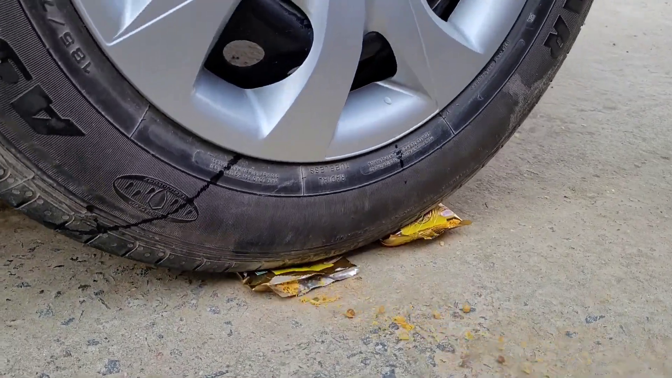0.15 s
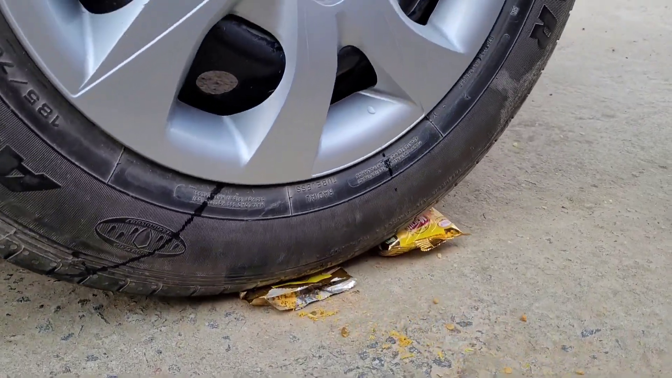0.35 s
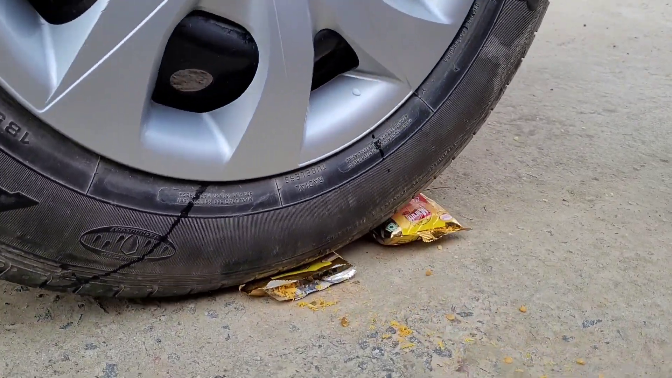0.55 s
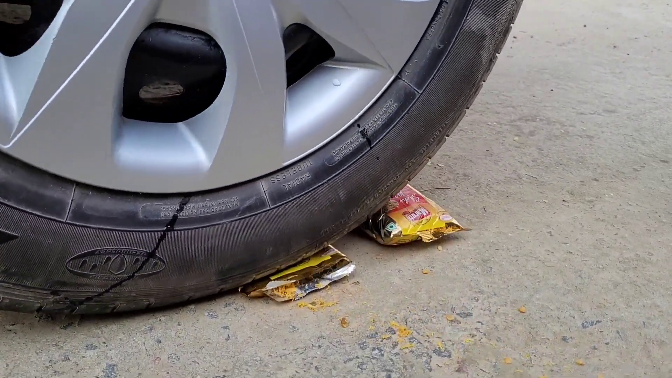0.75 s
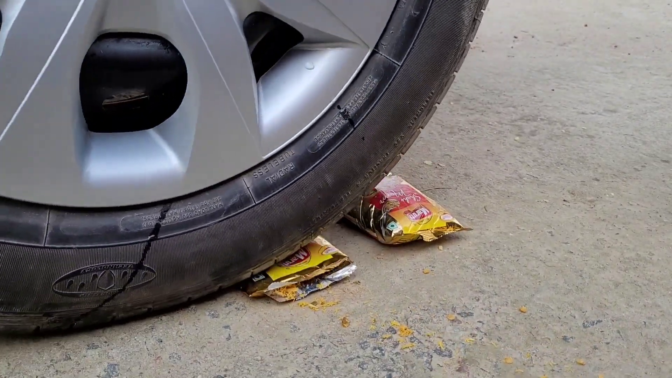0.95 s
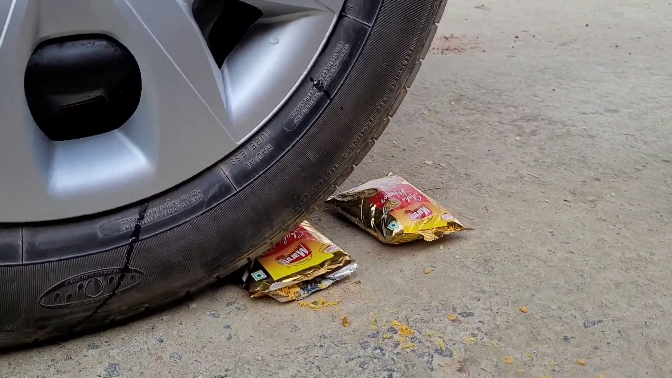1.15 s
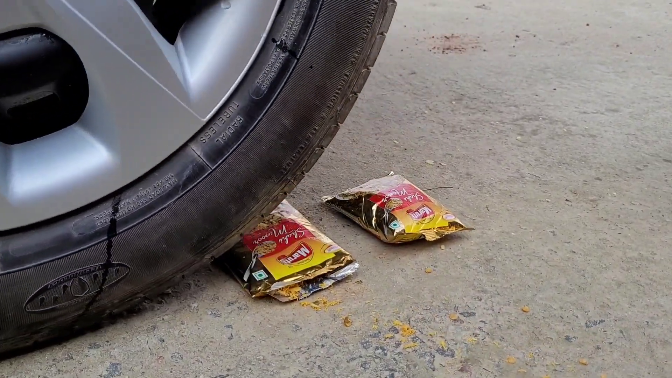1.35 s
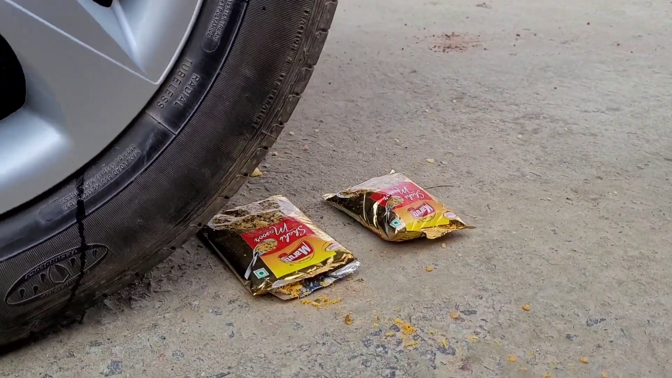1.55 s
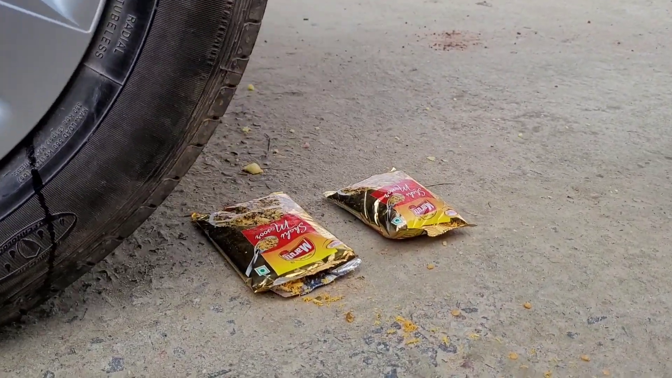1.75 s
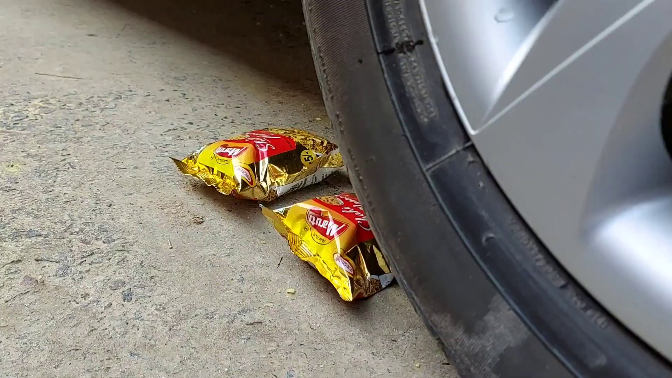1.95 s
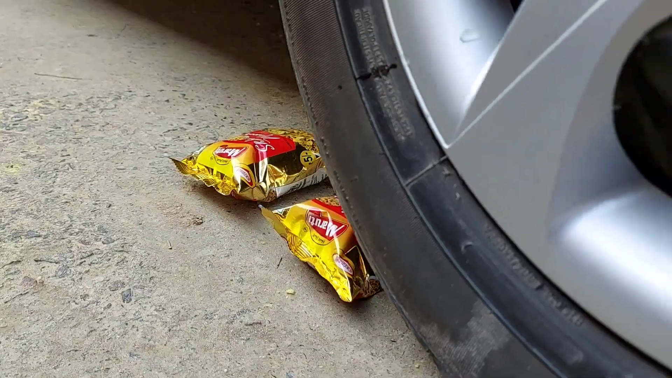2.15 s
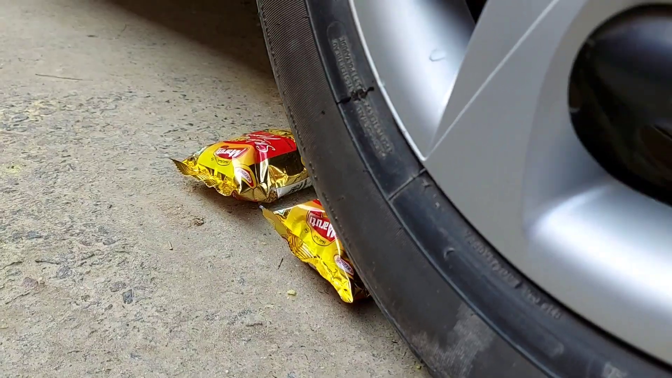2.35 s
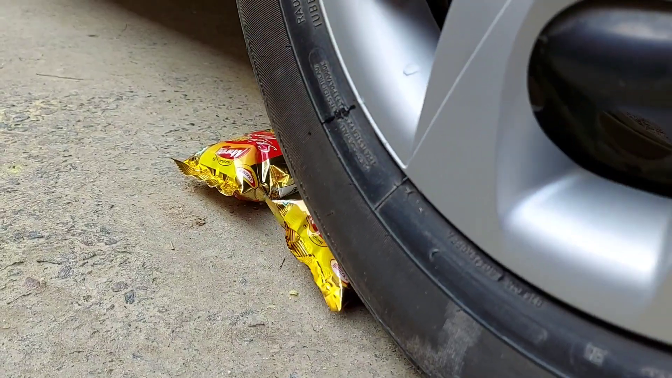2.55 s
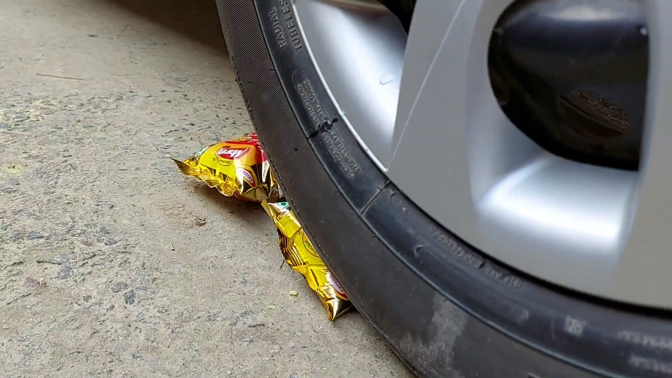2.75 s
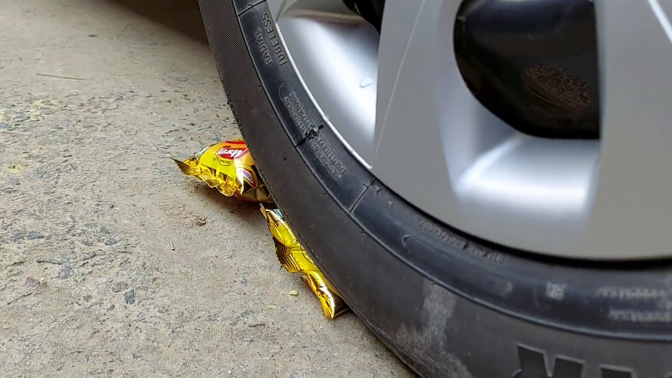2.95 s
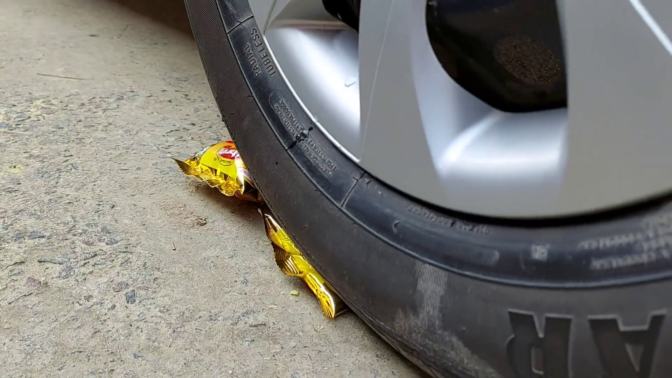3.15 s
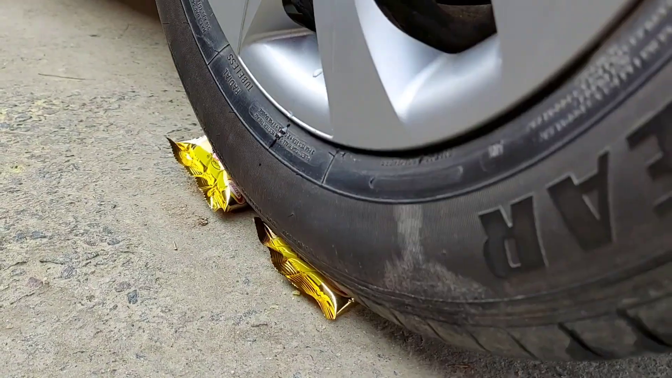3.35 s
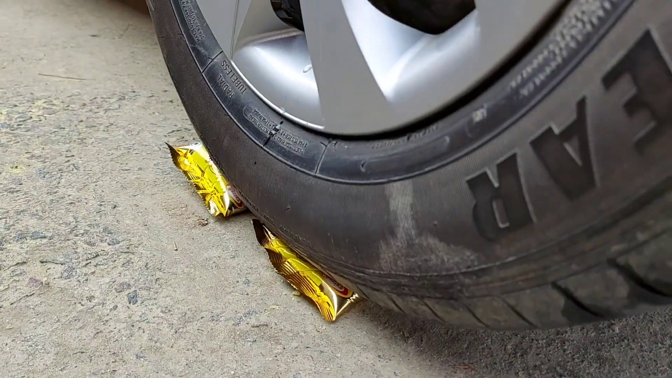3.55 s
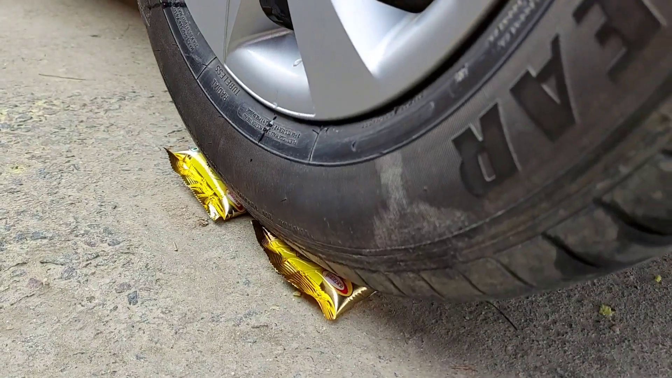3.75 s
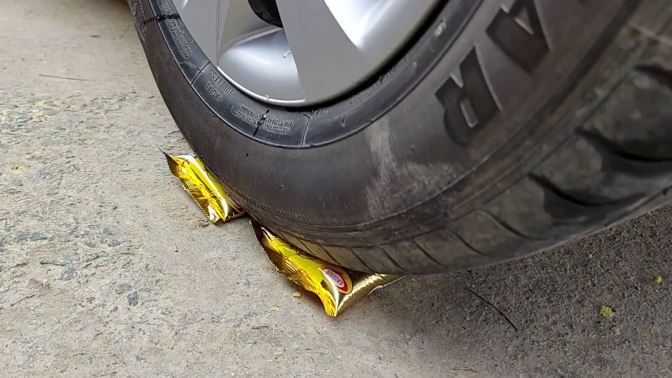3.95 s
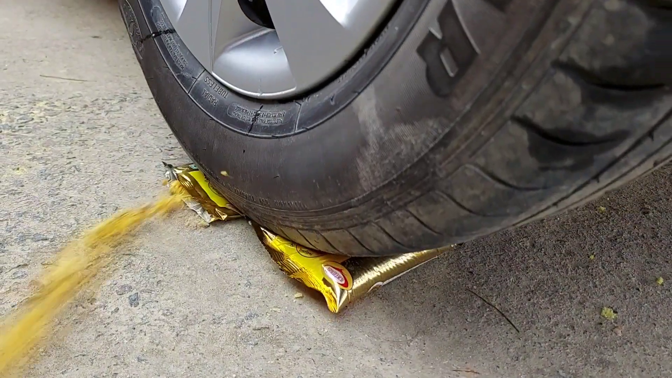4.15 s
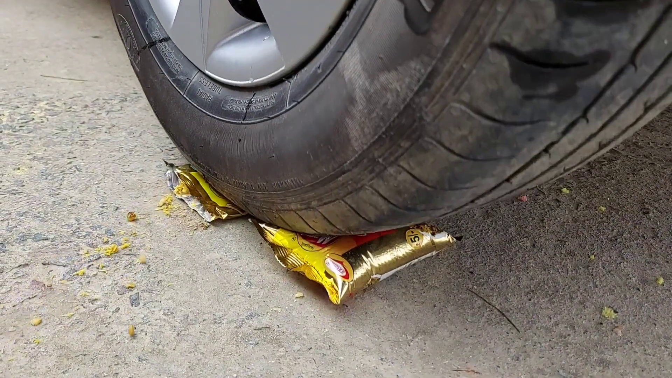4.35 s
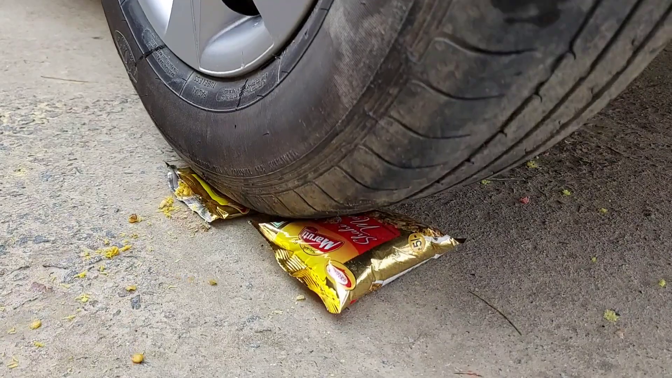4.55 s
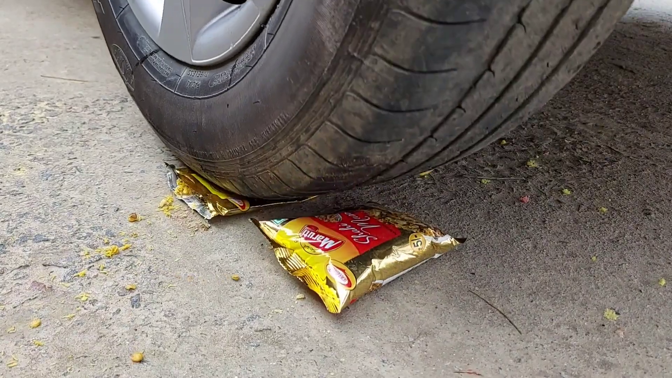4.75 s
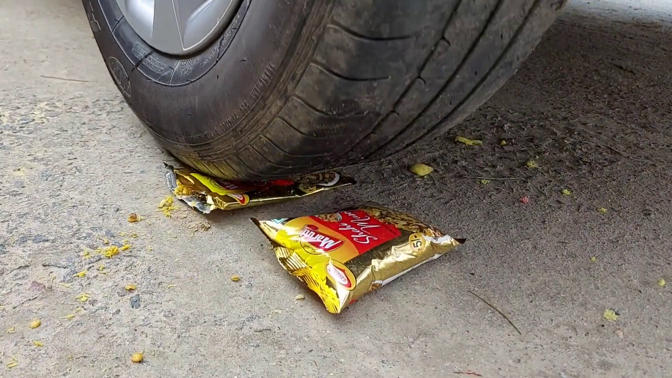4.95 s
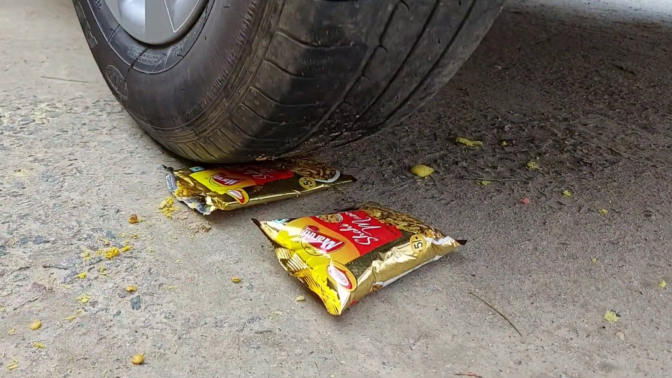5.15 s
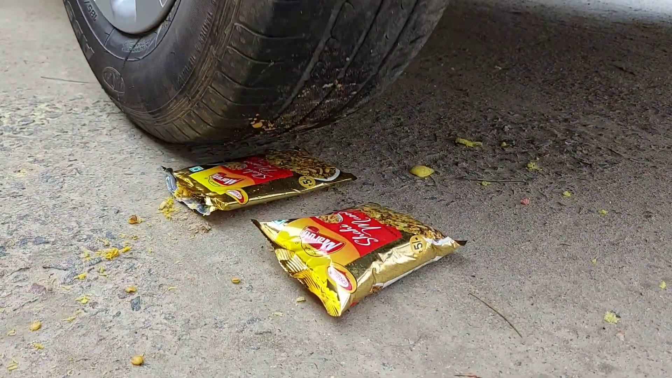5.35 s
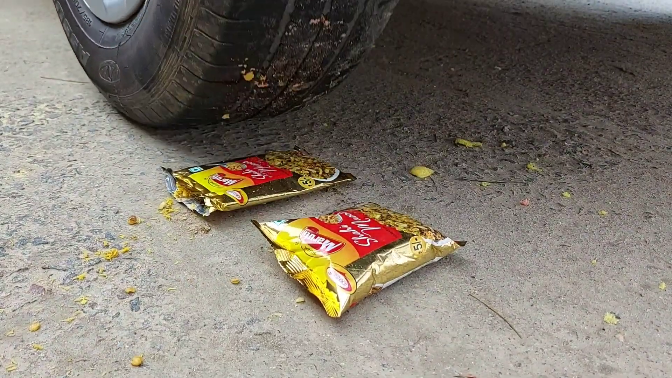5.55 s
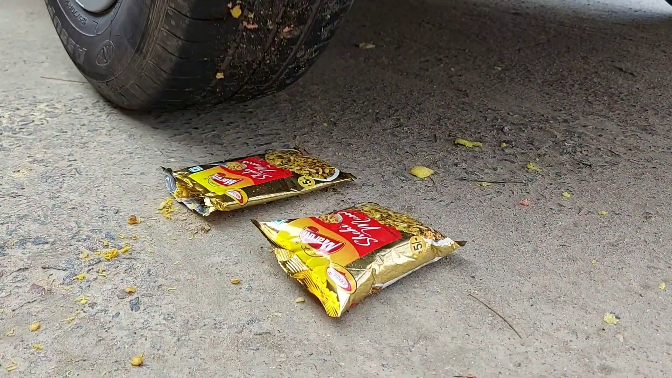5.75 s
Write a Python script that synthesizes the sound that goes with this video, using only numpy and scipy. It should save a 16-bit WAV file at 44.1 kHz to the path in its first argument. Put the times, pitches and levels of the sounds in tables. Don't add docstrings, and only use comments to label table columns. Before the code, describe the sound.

Close outdoor crunching: one airy bang, faint foil ticks over low engine idle, a brief fade, crackling snaps, then a sharper ringing burst.

```python
import sys
import numpy as np
from scipy import signal
from scipy.fft import rfft, irfft
from scipy.io import wavfile
from scipy.ndimage import uniform_filter1d

SR = 44100
rng = np.random.default_rng(int(sys.argv[2]) if len(sys.argv) > 2 else 0)


def voltage_ratio(decibels):
    exponent = np.asarray(decibels, float) / 20
    return 10 ** exponent


def generate_wav(sig):
    pcm = np.round(np.clip(np.atleast_2d(sig).T, -1, 1) * 32767).astype(np.int16)
    wavfile.write(sys.argv[1], SR, pcm)


N = 255471

BURST_TIMES = [
    .0918,
    4.2153,
]
# (level [dB rms], hold [s], t60 [s], first crack [dB], wall echo [dB])
BURST_JETS = [
    (-14.5, 0.026, 0.084, -23.5, -13.5),
    (-12.5, 0.0011, 0.16, -10.5, -10),
]
# (frequency [Hz], left [dB], right [dB])
PORT_BLASTS = [
    (59.4, -11, -43.5),
    (75.7, -39, -21.5),
]
# (frequency [Hz], density [dB per Hz])
BURST_SPECTRA = [
    [(71, -35), (120, -3.5), (177, -19.5), (334, -5.5), (473, -12), (892, -8), (1830, -13.5), (1980, -11),
     (2530, -16), (3520, -16), (5410, -25), (7050, -20), (8660, -36), (15000, -30), (16000, -48)],
    [(71, -47), (120, -6), (200, -12.5), (348, -8.5), (569, -15), (684, -6.5), (1050, -4), (1160, -8),
     (1370, -1), (1520, -8.5), (2700, -9), (4780, -14.5), (5800, -19), (6500, -32), (11300, -32.5),
     (15000, -62.5), (16000, -70.5)],
]
# (frequency [Hz], left-right [dB])
BURST_SIDES = [
    [(60, 4), (150, 0), (380, -6.5), (950, -0.5), (2380, -4.5), (5980, -6), (15000, -2.5)],
    [(60, 0), (150, 1.5), (380, 14.5), (950, 7), (2380, 11), (5980, -1.5), (15000, 1.5)],
]
# (time [s], peak [dB],
# ring [Hz], treble [dB], tail [dB])
PACKET_SNAPS = [(2.5247, -16.5, 1060, -26, -26), (2.5356, -19, 1100, -18, -18),
                (2.5544, -28.5, 2110, -10.5, -11.5), (2.5704, -27, 2310, -29, 0),
                (2.5805, -20, 1250, -31, -16), (2.5965, -9, 1420, -20.5, -14),
                (2.6054, -10.5, 2360, -21.5, -19.5), (2.6179, -12, 1210, -30.5, -17),
                (2.6254, -20.5, 1000, -48, -24), (2.6384, -14.5, 1250, -33, -11),
                (2.6469, 1.5, 2370, -24, -25), (2.6545, -13, 695, -22, -26),
                (2.6589, -5.5, 2250, -21, -11), (2.6724, -17.5, 1070, -36, -12),
                (2.6903, -7.5, 2360, -36.5, -19), (2.7048, -8, 2140, -35, -16),
                (2.7164, -14, 2670, -19.5, -2), (2.7232, -7, 2560, -24, -12),
                (2.7374, -10.5, 1580, -19.5, -12), (2.7455, -20, 3220, -18, -3),
                (2.7528, -18.5, 2200, -28.5, -16), (2.7665, -16.5, 1900, -21.5, 10),
                (2.7784, -22.5, 5000, -10.5, -18.5), (2.793, -26.5, 5000, -8.5, -10),
                (2.7965, -9, 2870, -17.5, -12), (2.817, -11.5, 2470, -7.5, -11.5),
                (2.8324, -13.5, 5130, -11.5, -9), (2.8494, -24, 2750, -20.5, 8),
                (2.8852, -30, 2200, -11, -12.5), (2.8953, -10, 5360, -22.5, -17),
                (2.897, -12, 1310, -4, -21), (2.9005, -15, 2930, -20, -9),
                (2.9125, -32.5, 4500, -2, -19), (2.9253, -34.5, 4500, -1, -22),
                (2.935, -30, 2380, -15, -9), (2.9387, -25, 4700, -5, -4),
                (2.9547, 1, 1920, -29.5, -26.5), (2.9675, -13.5, 2520, -24, -11),
                (2.9891, -17, 2030, -34, -14),
                (3.044, -17.5, 5160, -19, -10.5), (3.244, -29.5, 4470, -15, -11.5),
                    (3.4104, -23.5, 1370, -33, -15), (3.424, -27, 1280, -43, -16),
                    (3.4432, -17, 1900, -29, -29), (3.4628, -28, 1070, -15.5, -1),
                    (3.4955, -16, 2130, -16, -8), (3.5038, -23.5, 2870, -15.5, -2),
                    (3.5283, -28.5, 2800, -13, 3), (3.551, -25.5, 1900, -14.5, -10),
                    (3.602, -28, 2520, -14.5, -8), (3.6474, -31, 5000, -11, -4),
                    (3.653, -26.5, 3400, -15.5, -6.5), (3.6692, -24.5, 3420, -23, -7),
                    (3.6784, -28, 4610, -8, -8), (3.7069, -10.5, 4970, -6, -20),
                    (3.7004, -23, 4960, -18.5, -5), (3.736, -26, 4800, -14.5, -1),
                    (3.7701, -17.5, 5670, -9.5, -2.5), (3.799, -36, 4000, -6.5, -18),
                    (3.8042, -26.5, 4460, -15.5, -5), (3.8352, -22, 4200, -5.5, -14),
                    (3.871, -35, 1220, -9, -16), (3.9478, -20.5, 3400, -5.5, -16),
                    (3.979, -28, 2740, -7, 4), (4.026, -17, 5030, -18.5, -11),
                    (4.0574, -28.5, 1050, -20.5, -16), (3.4918, -22.5, 2600, -13.5, -5),
                    (4.0997, -28.5, 2190, -2, -7), (4.1057, -31.5, 1200, -17.5, -13.5),
                    (4.141, -33.5, 1330, -21, -14), (4.1697, -26.5, 1130, -21, -13),
                    (4.07, -37, 3000, 0, -18), (4.196, -36.5, 1100, -20, -18)]
# (time [s], peak [dB], ring
# [Hz], treble [dB])
FOIL_TICKS = [(0.0154, -30.5, 1350, -29), (.0468, -27, 1270, -18), (0.072, -38, 1250, -28),
              (0.3521, -44, 2680, -16), (0.521, -50, 4430, 6), (0.594, -52, 1560, -24.5),
              (0.6565, -41.5, 3420, -19), (0.812, -55.5, 1187, -14), (0.9878, -41.5, 3800, -27),
              (1.0742, -44.5, 3480, -24), (1.102, -52, 2260, -11), (1.245, -50, 5480, -9),
              (1.276, -46, 3800, -31.5), (1.5592, -39, 4520, -36), (1.7971, -23.5, 4200, -30),
              (2.214, -30, 2600, -28), (4.4767, -36, 1950, -13.5), (4.605, -43, 790, -35),
              (4.648, -53, 5500, -32), (4.5754, -38, 1940, -26), (4.7097, -44, 1370, -19),
              (4.7793, -43, 1980, -26), (5.0967, -49, 1670, -24), (5.112, -42, 1447, -13),
              (5.198, -42, 1580, -16), (5.2376, -38.5, 2020, -26), (5.35, -47, 5350, -25),
              (4.95, -47, 5200, -20), (5.2763, -44, 1990, -17), (5.3378, -48.5, 1370, -25),
              (5.3688, -45, 5240, -15), (5.4003, -48, 1430, -27.5), (5.4724, -53.5, 4900, -26),
              (3.022, -34.5, 1210, -21), (3.102, -35, 1320, -22), (3.108, -29, 2600, -9),
              (3.136, -32.5, 1400, -19), (3.147, -32.5, 1360, -16), (3.168, -24, 3420, -16),
              (3.182, -26, 3600, -11), (3.211, -34, 2300, -16), (3.251, -35, 1340, -31),
              (3.263, -31, 1350, -33), (3.304, -41, 1460, -31), (3.325, -32.5, 1400, -39),
              (3.343, -41, 1700, -33), (3.358, -35, 1400, -36), (3.381, -33, 1300, -28),
              (3.391, -34, 1340, -49), (3.515, -22, 3260, -18), (3.543, -37, 1090, -20),
              (3.557, -34, 1300, -16.5), (3.566, -35, 1000, -4), (3.612, -42.5, 1620, -12),
              (3.915, -34, 1080, -15), (4.089, -37, 1090, -14), (4.123, -37.5, 1090, -20.5),
              (4.312, -26, 1040, -22), (0.367, -40, 6500, -25), (0.482, -44, 3500, -19),
              (0.579, -50, 6100, -24), (0.611, -47, 5800, -25)]
# (from [s], to [s], peak [dB], ring [Hz], treble [dB])
CRACK_RUNS = [
    (2, 2.9, -42, 2200, -17),
    (2.4, 5.8, -45, 2500, -14),
    (0.299, 1.2, -56.5, 2480, -16.5),
    (7.7, 5.6, -56, 2900, -33.5),
]
# (time [s], level [dB], ring [Hz])
PACKET_CREAK = [(2.971, -62, 1200), (3.03, -53.5, 1220), (3.14, -47, 1180), (3.19, -53.5, 1350),
                (3.268, -49, 1380), (3.341, -52.5, 1540), (3.42, -46, 1280), (3.5, -55, 1040),
                (3.578, -51, 1070)]
# (time [s], level [dB], ring [Hz])
FOIL_RUSTLE = [(2.418, -65, 2400), (2.426, -52, 2380), (2.45, -51, 2330), (2.464, -37.5, 2570),
               (2.5, -47.5, 2650), (2.53, -45, 2520)]
# (time [s], level [dB], ring [Hz])
CRISP_GROAN = [(2.55, -41, 303), (2.604, -30, 350), (2.63, -33, 340), (2.655, -32, 490),
               (2.701, -40.5, 455)]
# (frequency [Hz], density [dB per Hz])
SNAP_SPECTRA = [
    [(150, -22.5), (250, -4), (393, -17.5), (460, -11.5), (698, -12.5), (906, -15), (1330, -17.5),
     (2020, -13.5), (3060, -19), (4490, -14.5), (5070, -15.5), (7190, -7), (9010, -24.5), (14900, -22),
     (16000, -43)],
    [(150, -13), (250, -21.5), (308, -24), (444, 1.5), (629, -14), (1350, -9.5), (1790, -18.5), (2020, -9),
     (2960, -8.5), (4260, -7.5), (4990, 2.5), (7060, -7.5), (10400, -5.5), (14900, -32), (16000, -25.5)],
]
# (frequency [Hz], left-right [dB])
FOIL_SIDES = [
    [(60, 4), (120, 2), (240, 1), (480, -1), (950, -5), (1890, 0), (3770, -3), (7520, -8.5), (15000, 4)],
    [(60, -3.5), (120, 4), (240, 10.5), (480, 7.5), (950, 16.5), (1890, 14), (3770, 0.5), (7520, 0),
     (15000, 21.5)],
]
# (frequency [Hz], density [dB per Hz])
BED_SPECTRA = [
    [(150, -15.5), (280, -8), (800, -13.5), (1350, -20), (2100, -14), (3000, -16), (4100, -12.5),
     (5600, -17.5), (7000, -12.5), (9000, -28.5), (14900, -24), (16000, -43.5)],
    [(150, -34), (260, -5.5), (452, -4), (800, -9.5), (1500, -11), (2300, -6), (3600, -10.5), (5000, -11.5),
     (6500, -27.5), (10500, -25.5), (14000, -36), (16000, -45.5)],
]
# (time [s], half length [s], lift [dB])
FOIL_FOLDS = [
    (2.76, 0.22, 18.5),
    (3.705, 0.22, 9.5),
]
# (time [s], peak [dB], swing [Hz])
DULL_THUDS = [(0.1, -12.5, 350), (0.112, -15.5, 280), (0.808, -53, 200), (1.094, -52.5, 112),
              (2.169, -28, 180), (5.219, -44.5, 190), (4.293, -27.5, 87), (4.5, -32, 107),
              (3.6, -34.5, 150), (3.6, -30, 130), (2.578, -24, 370), (4.3, -36, 420), (1.6, -48, 290),
              (4.232, -22.5, 260)]
# (frequency [Hz], width [Hz], level [dB])
ENGINE_RESONANCES = [(30, 61, -10.5), (61.76, 6.8, 0), (95, 42, -3), (142.3, 22, -6.5), (161.7, 34, -7),
                     (205, 31, -14.5), (406, 150, -14)]
# (time [s], gain [dB], grind [dB])
GAIN_AND_GRIND = [(0.0, -36, -9.5), (0.418, -64, 1), (0.91, -67.5, -7), (1.411, -58, -10.5),
                  (1.734, -45.5, -10), (1.901, -47.5, -7), (2.12, -32.5, -16.5), (2.28, -36.5, -14),
                  (2.55, -34.5, -16), (2.75, -36, -13), (3.09, -41, -9.5), (3.46, -41.5, -7),
                  (3.71, -42.5, -7.5), (4.18, -37, -14.5), (4.32, -46.5, -1.7), (4.73, -58, -7),
                  (5.33, -57, -12), (5.79, -47.5, -16.5)]

CUT_S = 2.0
FADE_S, FADE_DB = (0.16, 0.2), -35.5
TYRE_HZ, TYRE_T60, TYRE_DB = 242, 1.13, (-36, -35)
TYRE_BEAT_HZ, TYRE_BEAT_DB = 4.3, -11
SNAP_T60, TICK_T60, T60_SPREAD_DB, TICK_TAIL_DB = 0.076, 0.04, 2, -9
PAN_DB, PAN_DB_PER_OCT, PAN_SPREAD_DB = (-2.5, 8.5), (-2.3, -4), 1
RUN_SPREAD_DB, RUN_SPREAD_OCT = 8, 0.26
GRIT_HZ, SPLIT_HZ = 3850, 7800
GRIT_DB, FIZZ_DB = (2, 2), (-10, -16)
PORT_LAG = 4
HALVES = np.array([[0.5], [-0.5]])


def evened(x):
    return x / np.sqrt(np.mean(x ** 2) + 1e-20)


def read(points, hz):
    f, value = np.transpose(points)
    return np.interp(np.log(hz + 1), np.log(f + 1), value)


def add(mix, s, sound):
    part = mix[:, round(s * SR):][:, :sound.shape[1]]
    part += sound[:, :part.shape[1]]


def coloured(x, shape_db):
    log = np.log(voltage_ratio(np.maximum(shape_db, -100)))
    mirrored = np.concatenate([log, log[..., -2:0:-1]], -1)
    phase = -signal.hilbert(mirrored).imag[..., :log.shape[-1]]
    return irfft(rfft(x) * np.exp(log + 1j * phase), x.shape[-1])


def ports(colour, side, hz):
    return read(colour, hz) + HALVES * read(side, hz)


def resonate(x, hz, width):
    return signal.lfilter(*signal.iirpeak(hz, hz / width, SR), x)


def tyre_ring(t, tyre_db):
    ring = np.sin(2 * np.pi * TYRE_HZ * t)
    ring += voltage_ratio(TYRE_BEAT_DB) * np.sin(2 * np.pi * (TYRE_HZ - TYRE_BEAT_HZ) * t)
    return voltage_ratio(tyre_db - 60 * t / TYRE_T60) * ring


def port_blast(t, blast):
    hz, *side_db = blast
    level_db = np.array(side_db)[:, None] - 60 * np.maximum(t - 0.03, 0) / 0.018
    return voltage_ratio(level_db) * np.sin(2 * np.pi * hz * t + 2.7)


def burst(jet_row, blast, colour, side, tyre_db):
    db, hold, t60, crack_db, echo_db = jet_row
    t = np.arange(2 ** 16) / SR
    hz = np.fft.rfftfreq(len(t), 1 / SR)
    jet = voltage_ratio(-60 * np.maximum(t - hold, 0) / t60) + 2.6 * np.exp(-t / 0.0023)
    late = np.maximum(t - 0.078, 0)
    wall = voltage_ratio(echo_db - 60 * late / 0.23) * (1 - np.exp(-(late / 0.016) ** 2))
    both, left, right, far_left, far_right = rng.standard_normal((5, len(t)))
    drive = (0.5 * both + np.array([left, right])) * jet
    drive[:, :3] = [5, 5, -4]
    shape_db = ports(colour, side, hz)
    near = coloured(drive, shape_db)
    air_db = -3 / (1 + (6000 / (hz + 1)) ** 4)
    far = coloured(np.array([far_left, far_right]) * wall, shape_db + air_db)
    noise = voltage_ratio(db) * (near + far) / np.std(near.mean(0)[:round(0.012 * SR)])
    edge_db = -40 / (1 + (hz / 9000) ** 6) - 30 / (1 + (15600 / (hz + 1)) ** 30)
    crack = coloured((both + np.array([left, right])) * np.exp(-t / 0.004), edge_db)
    return noise + voltage_ratio(crack_db) * crack + tyre_ring(t, tyre_db) + port_blast(t, blast)


def snap(s, peak_db, ring_hz, treble_db, tail_db, t60, pan_db, chance):
    shot, t = int(s >= CUT_S), np.arange(chance.shape[1]) / SR
    hz = np.fft.rfftfreq(len(t), 1 / SR)
    cracks = chance[0] * (abs(chance[1]) > 2.2) * voltage_ratio(-60 * t / 0.02) * 0.4
    first = np.exp(-((t - 0.0007) * ring_hz * 12) ** 2) * ring_hz / 2000
    cracks += (chance[0] * 0.2 + 0.8) * first
    tail_env = voltage_ratio(tail_db - 60 * t / np.clip(t60, 0.01, 0.3)) * (1 - np.exp(-t / 0.00036))
    tail = (1.1 * chance[0] + chance[2:]) * tail_env
    spit = (chance[0] + 0.5 * chance[2:]) * t / 0.0008 * np.exp(-t / 0.0008)
    port_db = ports(SNAP_SPECTRA[shot], FOIL_SIDES[shot], hz)
    patch = 1 / (1 + (3.2 * (hz / ring_hz - ring_hz / (hz + 1))) ** 2)
    ring_db = 10 * np.log10(patch + 0.56 * voltage_ratio(treble_db))
    ring_db = ring_db - 24 / (1 + (hz / 500) ** 4) - 18 / (1 + (7000 / (hz + 1)) ** 6)
    top_db = -50 / (1 + (hz / 6500) ** 6)
    body = coloured(cracks + 0.6 * tail, 0.7 * port_db + ring_db)
    top = coloured(0.7 * spit + 1.3 * tail * voltage_ratio(-60 * t / 0.27), port_db + top_db)
    sound = body / abs(body).max() + voltage_ratio(treble_db + 8) * top / abs(top).max()
    sound = sound / np.std(sound, axis=1, keepdims=True) * voltage_ratio(np.clip(pan_db, -14, 14) * HALVES)
    return voltage_ratio(peak_db) * sound / abs(sound.mean(0)).max()


def snaps(rows, t60, size):
    out = np.zeros((2, N))
    for row in rows:
        s, hz = row[0], row[2]
        shot = int(s >= CUT_S)
        longer, aside = rng.standard_normal(2)
        pan_db = PAN_DB[shot] + PAN_DB_PER_OCT[shot] * np.log2(hz / 1000) + PAN_SPREAD_DB * aside
        chance = rng.standard_normal((4, size))
        add(out, s, snap(*row, t60 * voltage_ratio(T60_SPREAD_DB * longer), pan_db, chance))
    return out


def small_cracks(count):
    rows = []
    for start, end, db, hz, treble_db in CRACK_RUNS:
        for k, (place, size, tone, edge) in enumerate(rng.uniform(-1.3, 1, (count, 4))):
            s = start + (end - start) * (k + 0.5 + 0.5 * place) / count
            ring_hz = hz * 2 ** (RUN_SPREAD_OCT * tone)
            rows.append((s, db + RUN_SPREAD_DB * size, ring_hz, treble_db + 8 * edge))
    return rows


def creak(rows, per_s, width):
    s, db, hz = np.transpose(rows)
    t = np.arange(s[0], s[-1], 1 / SR)
    slips = voltage_ratio(3.6 * np.minimum(rng.exponential(1, len(t)), 3)) * (rng.random(len(t)) < per_s / SR)
    slips = slips + 0.1 * rng.standard_normal(len(t))
    turn = np.exp(2j * np.pi * np.cumsum(np.interp(t, s, hz)) / SR)
    r = np.exp(-np.pi * width / SR)
    rung = (turn * signal.lfilter([1], np.convolve([1, -r], [1, -r * r]), slips / turn)).real
    return evened(rung) * voltage_ratio(np.interp(t, s, db)) * voltage_ratio([[3.5], [-5.5]])


def crunch(per_s=1500, smooth=0.63, patchy_db=2.0):
    size = N + N % 2
    hz = np.fft.rfftfreq(size, 1 / SR)
    clumps = voltage_ratio(1.8 * evened(uniform_filter1d(rng.standard_normal(size), 700)))
    grains = (rng.random(size) < per_s / SR) * clumps
    smear, hiss = np.exp(-np.arange(300) / 41.0), rng.standard_normal((3, size))
    grain_env = np.sqrt(abs(signal.oaconvolve(grains ** 2, smear ** 2)[:size]))
    drive = evened(grain_env * (hiss[0] + 1.1 * hiss[1:])) + smooth * rng.standard_normal((2, size))
    z = signal.stft(drive, nperseg=512)[2]
    patches = uniform_filter1d(rng.standard_normal(z.shape[1:]), size=9, axis=0)
    patches = evened(uniform_filter1d(patches, size=6, axis=1))
    drive = signal.istft(z * voltage_ratio(patchy_db * patches), nperseg=512)[1][:, :size]
    low, top = 1 / (1 + (hz / GRIT_HZ) ** 6), 1 / (1 + (SPLIT_HZ / (hz + 1)) ** 12)
    _, body, fizz = bed_gains()
    out = np.zeros((2, N))
    for shot, (colour, side) in enumerate(zip(BED_SPECTRA, FOIL_SIDES)):
        here = (np.arange(N) >= CUT_S * SR) == shot
        z = rfft(drive) * voltage_ratio(ports(colour, side, hz))
        grit = voltage_ratio(GRIT_DB[shot]) * np.sqrt(body * fizz)
        for gain, band in ((body, low), (grit, (1 - low) * (1 - top)), (fizz, top)):
            part = irfft(z * band, size)[:, :N]
            out += here * gain * part / np.std(part.mean(0))
    return out


def thud(peak_db, hz):
    t = np.arange(5000) / SR
    swing = t * hz * np.exp(-t * hz / 0.78) * np.sin(2 * np.pi * hz * t)
    return voltage_ratio(peak_db) * np.tile(swing / abs(swing).max(), (2, 1))


def engine():
    both, left, right = rng.standard_normal((3, N))
    throb = voltage_ratio(2.7 * evened(resonate(rng.standard_normal(N), 23, 5.0)))
    drive = (both + 0.38 * np.array([left, right])) * throb
    rumble = np.zeros((2, N))
    for hz, width, db in ENGINE_RESONANCES:
        rumble += voltage_ratio(db) * evened(resonate(resonate(drive, hz, width * 0.59), hz, width))
    return bed_gains()[0] * evened(rumble)


def bed_gains():
    t = np.arange(N) / SR
    s, gain_db, grind_db = np.transpose(GAIN_AND_GRIND)
    fade = np.interp(t - CUT_S, [-FADE_S[0], 0, FADE_S[1]], [1, voltage_ratio(FADE_DB), 1])
    fizz_db = np.where(t < CUT_S, *FIZZ_DB)
    fizz_db = fizz_db + sum(db * np.maximum(1 - abs(t - at) / half, 0) for at, half, db in FOIL_FOLDS)
    body = fade * voltage_ratio(np.interp(t, s, gain_db + grind_db))
    return fade * voltage_ratio(np.interp(t, s, gain_db)), body, body * voltage_ratio(fizz_db)


def scene():
    mix, foil = engine(), crunch()
    for s, *parts in zip(BURST_TIMES, BURST_JETS, PORT_BLASTS, BURST_SPECTRA, BURST_SIDES, TYRE_DB):
        add(mix, s, burst(*parts))
    for s, *rest in DULL_THUDS:
        add(mix, s, thud(*rest))
    foil += snaps(PACKET_SNAPS, SNAP_T60, size=3840)
    ticks = FOIL_TICKS + small_cracks(count=12)
    foil += snaps([(*row, TICK_TAIL_DB) for row in ticks], TICK_T60, size=1536)
    add(foil, PACKET_CREAK[0][0], creak(PACKET_CREAK, per_s=160, width=300))
    add(foil, FOIL_RUSTLE[0][0], creak(FOIL_RUSTLE, per_s=770, width=720))
    add(foil, CRISP_GROAN[0][0], creak(CRISP_GROAN, per_s=110, width=320))
    return mix + np.array([np.roll(foil[0], PORT_LAG), foil[1]])


def band_limit(x):
    return signal.sosfilt(signal.butter(12, 16660, fs=SR, output="sos"), x)


def record(dry):
    driven = 1.138 * np.tanh(dry / 1.15)
    top_edge = signal.cheby2(12, 27, 15700, fs=SR, output="sos")
    mix = signal.sosfilt(top_edge, driven)
    return band_limit(mix)


dry = scene()
out = record(dry)
generate_wav(out)
```